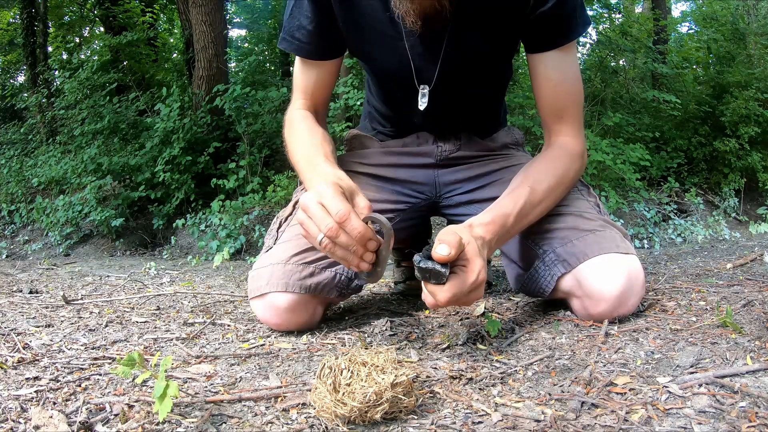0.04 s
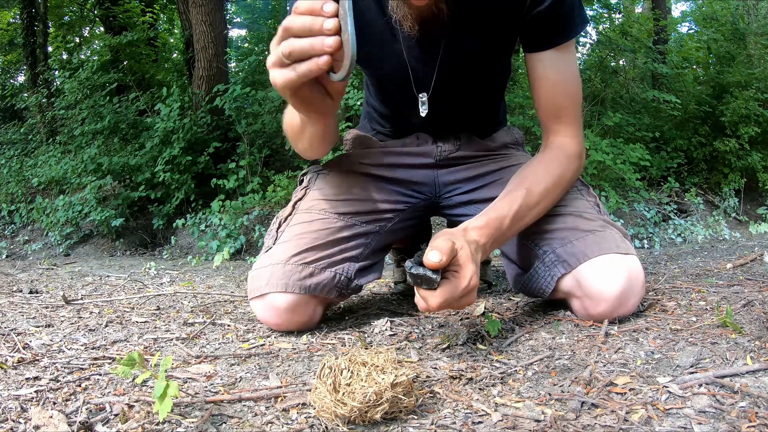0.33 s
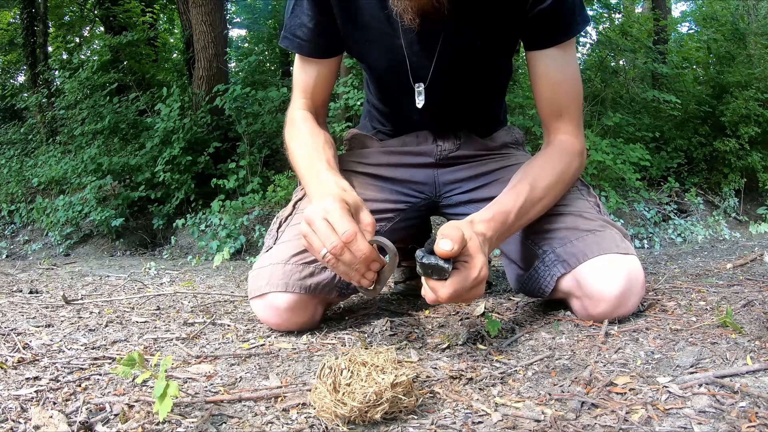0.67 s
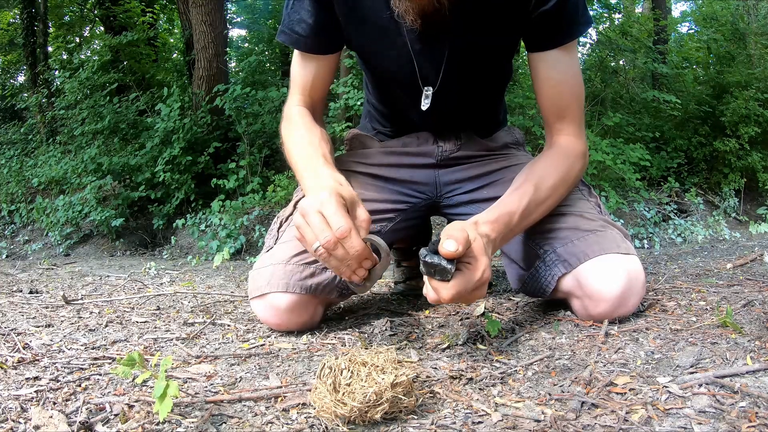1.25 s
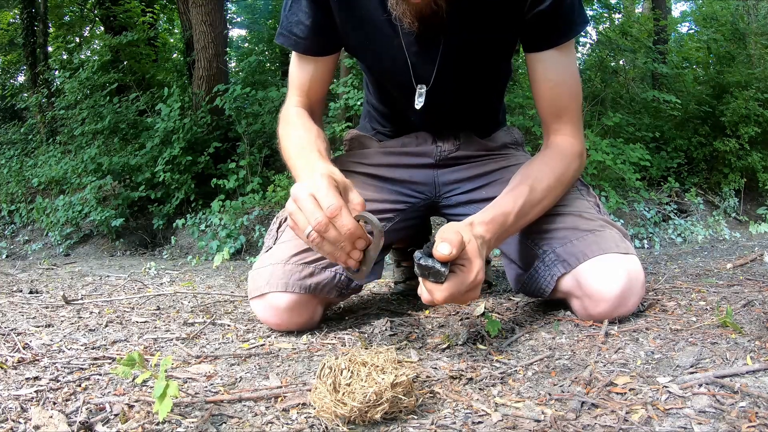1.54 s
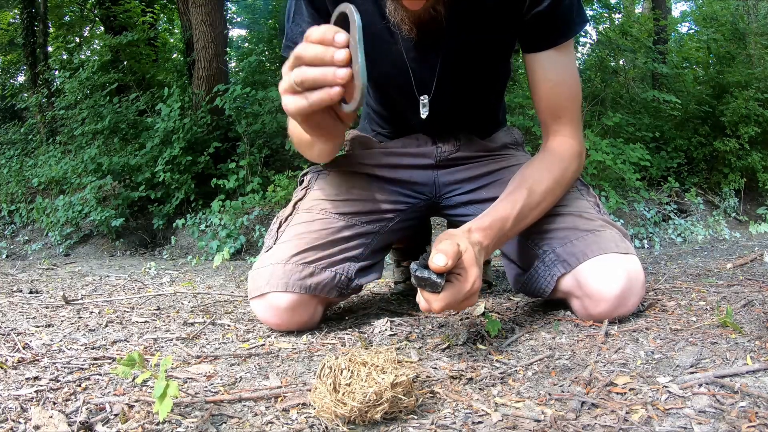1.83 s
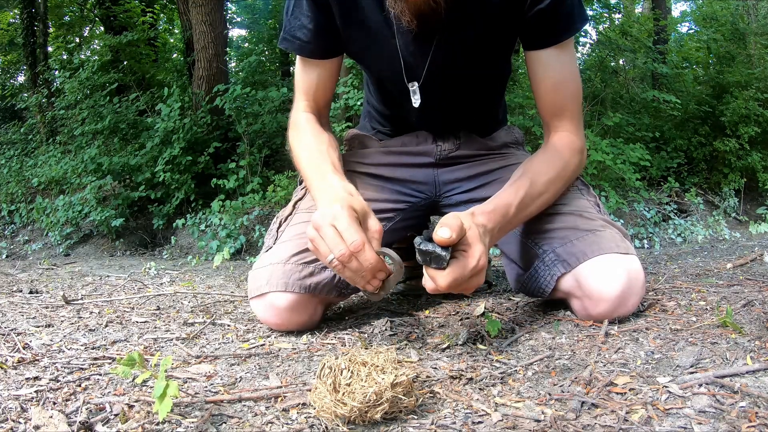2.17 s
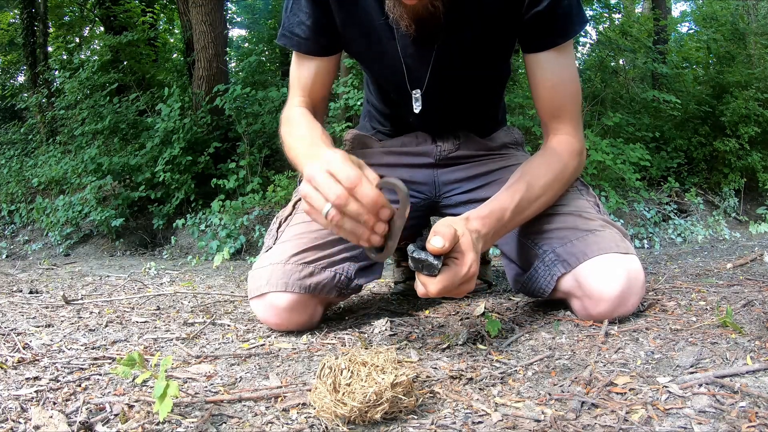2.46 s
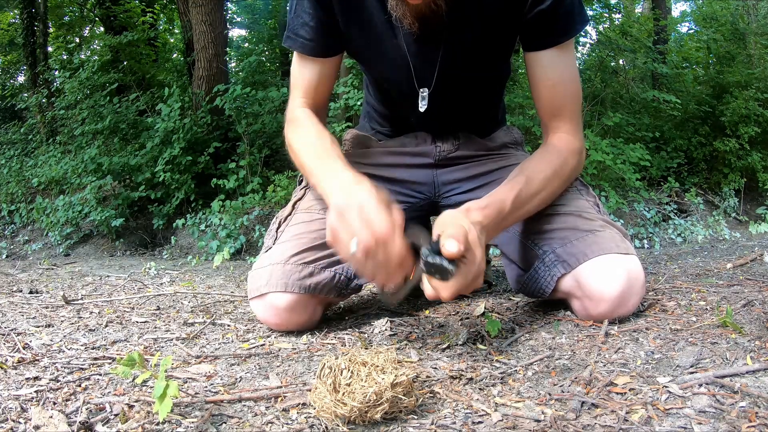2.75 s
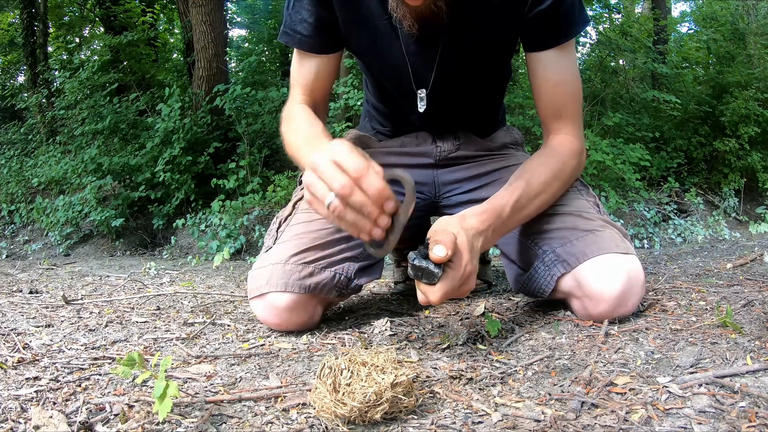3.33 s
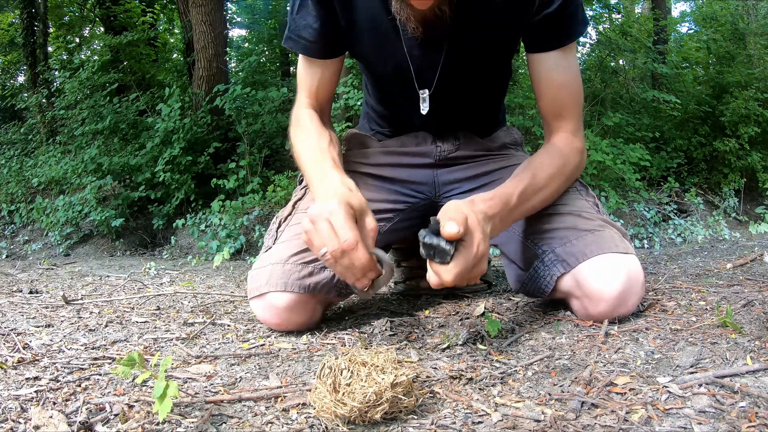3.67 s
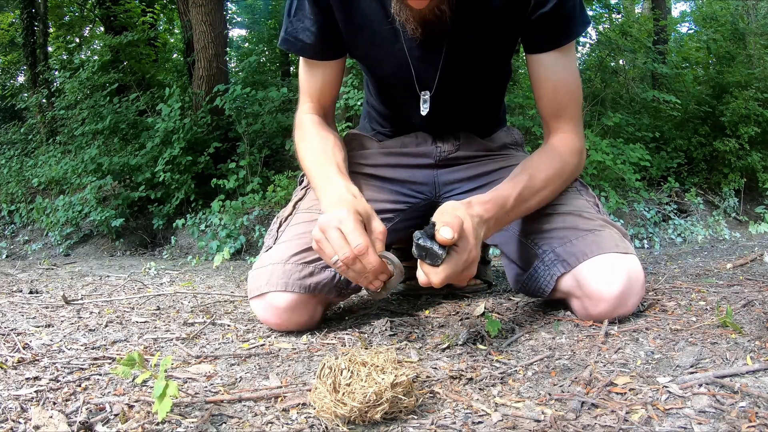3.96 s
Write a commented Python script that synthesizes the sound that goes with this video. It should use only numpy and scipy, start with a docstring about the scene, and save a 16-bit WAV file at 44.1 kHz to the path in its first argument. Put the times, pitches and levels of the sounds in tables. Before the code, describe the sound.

Sharp clicks of steel hitting stone come five times, a little under a second apart, close by in a forest. Behind them small birds chirp, one nearer and later one farther off, over soft rumble and leaf hiss.

```python
"""In a forest, a hand-held fire steel strikes a stone five times, close by.
Each blow is a crack, a few milliseconds of scraping and a rebound; this force excites the modes
of steel and stone, leaving a faint ring, and the trees scatter the sound back. Songbirds sing
gliding tones over a low outdoor rumble. An automatic gain control ducks after every blow."""
import sys
import numpy as np
from scipy import signal
from scipy.fft import rfft, irfft
from scipy.io import wavfile
from scipy.ndimage import uniform_filter1d, minimum_filter1d

SR = 44100
rng = np.random.default_rng(int(sys.argv[2]) if len(sys.argv) > 2 else 0)


def inscribe(sig):
    """Save sig as 16-bit PCM at rate SR to the path in sys.argv[1].

    A 1-D sig is mono; a 2-D sig holds one channel per row.
    Samples are clipped to [-1, 1] before scaling.
    """
    pcm = np.round(np.clip(np.atleast_2d(sig).T, -1, 1) * 32767)
    wavfile.write(sys.argv[1], SR, pcm.astype(np.int16))


N = 176400
SIDES = np.array([[.5], [-.5]])  # splits a left-minus-right difference between the channels

# likeness of diffuse sound at the two microphones (frequency [Hz], coherence [ratio])
COHERENCE = [(30, .995), (150, .997), (350, .95), (700, .7), (1400, .55), (2500, .75), (4200, .85),
             (5500, .5), (9000, .05)]


def amp(db):
    """Decibels to amplitude ratio."""
    return 10 ** (np.asarray(db) / 20)


def unit_rms(x):
    """Normalisation to an rms of 1."""
    return x / np.sqrt(np.mean(x ** 2) + 1e-20)


def read(points, hz):
    """Interpolation of a table on a log-frequency axis."""
    f, value = np.transpose(points)
    return np.interp(np.log(hz + 1), np.log(f + 1), value)


def add(mix, start, sound):
    """Superposition: a sound joins the mix at a time in seconds."""
    part = mix[..., max(round(start * SR), 0):][..., :sound.shape[-1]]
    part += sound[..., :part.shape[-1]]


def drift(t, rate):
    """Slow noise: straight lines through rate random values a second."""
    return np.interp(t * rate, np.arange(2048), rng.standard_normal(2048))


def minimum_phase(db):
    """Minimum phase: the most compact causal impulse response with the given gains."""
    log_gain = np.log(amp(np.r_[db, db[-2:0:-1]]))
    return np.fft.ifft(np.exp(np.conj(signal.hilbert(log_gain)))).real


def diffuse_pair(left, independent, hz):
    """Partial coherence: two noise spectrograms become a stereo pair, most alike in the bass."""
    same = read(COHERENCE, hz)[:, None]
    return np.array([left, same * left + np.sqrt(1 - same ** 2) * independent])


def air():
    """Spectrally shaped noise: outdoor rumble and leaf hiss with drifting patches."""
    # noise spectrum (frequency [Hz], relative density [dB])
    spectrum = [(12, -28), (20, -5.5), (48, -6), (72, 2.5), (167, -5.5), (420, -17), (525, -19.5),
                (571, -18), (639, -19), (695, -17), (1030, -18), (1800, -24.5), (2440, -26), (4770, -25.5),
                (7680, -39), (9330, -43.5), (11000, -58.5), (14200, -77), (15900, -78)]
    # stereo balance (frequency [Hz], left minus right [dB])
    balance = [(150, 0), (700, -2), (2000, 0)]
    frames, hz = N // 512 + 6, np.fft.rfftfreq(2048, 1 / SR)
    left_re, left_im, other_re, other_im, patches = rng.standard_normal((frames, len(hz), 5)).T
    patches = uniform_filter1d(patches, size=14, axis=0)  # across frequency
    patch_db = unit_rms(uniform_filter1d(patches, size=8, axis=1))  # across time
    pair = diffuse_pair(left_re + 1j * left_im, other_re + 1j * other_im, hz)
    pair *= amp(read(spectrum, hz)[:, None] + patch_db + (SIDES * read(balance, hz))[:, :, None])
    wash = signal.istft(pair, nperseg=2048, noverlap=1536)[1][:, :N]
    return amp(-35) * unit_rms(wash)


def hum():
    """Random modulation of level and pitch makes a faint, far hum waver."""
    # steady tones (frequency [Hz], level [dB])
    tones = [(62, -42.5), (523, -61.5), (638, -56), (695, -64)]
    t, out = np.arange(N) / SR, np.zeros(N)
    for hz, db in tones:
        level = amp(db + 3.1 * drift(t, 4.67))
        phase = 2 * np.pi * np.cumsum(hz + 3 * drift(t, 12)) / SR
        out += level * np.sqrt(2) * np.sin(phase)
    return out


def forest_echo(x):
    """Scattering from trunks and leaves: reverberation in which each band decays at its own rate."""
    # reverberation time (frequency [Hz], T60 [s])
    decay_times = [(500, 0.4), (3000, 0.41), (6000, 0.64), (13000, 0.55)]
    reflections = rng.standard_normal((2, SR)) * (rng.random((2, SR)) < .06)
    hz, t, bands = signal.stft(reflections, SR, nperseg=256)
    envelope = amp(-60 * t / read(decay_times, hz)[:, None]) * np.minimum(t / 0.0043, 1)
    tail = signal.istft(diffuse_pair(*bands, hz) * envelope, SR, nperseg=256)[1]
    return signal.fftconvolve(x, tail / np.linalg.norm(tail[0]), axes=1)[:, :N]


def note(length, first_hz, middle_hz, last_hz, db, flutter_hz=0, swing_hz=0):
    """Frequency modulation: a whistle bends through three pitches; flutter chops it into sweeps."""
    t = np.arange(0, length, 1 / SR)
    progress, cycle = t / length, (t * flutter_hz) % 1
    glide = np.polyval(np.polyfit([0, .5, 1], [first_hz, middle_hz, last_hz], 2), progress)
    hz = glide * (1 + 0.0191 * drift(t, 400)) + swing_hz * (2 * cycle - 1)
    fade = np.sin(np.pi / 2 * np.clip(np.minimum(progress, 1 - progress) / 0.17, 0, 1))
    level = fade * amp(db + 3.5 * drift(t, 231.5))
    pulses = np.sin(np.pi * cycle) ** 0.58 if flutter_hz else 1
    return level * pulses * np.sqrt(2) * np.sin(2 * np.pi * np.cumsum(hz) / SR)


def phrase(notes):
    """Superposition of notes. A note row is (time [s], length [s], start [Hz], middle [Hz], end [Hz],
    level [dB]); a flutter row adds (flutter rate [Hz], swing [Hz])."""
    out = np.zeros(N)
    for start, *shape in notes:
        add(out, start, note(*shape))
    return out


def repeat(starts, notes):
    """Delayed, scaled copies of one phrase."""
    out, group = np.zeros(N), phrase(notes)
    for start, db in starts:
        add(out, start, amp(db) * group)
    return out


def perch(song, pan_db, echo_db):
    """Level difference gives a bird its direction, the share of reverberation its distance."""
    direct = song * amp([[pan_db], [-pan_db]])
    return direct + amp(echo_db) * forest_echo(direct)


def deep_wood():
    """Beyond the critical distance, birds are heard mostly as reverberation."""
    # soft whistles (note rows)
    whistles = [(.14, 0.059, 2780, 2984, 3030, -47), (.21, .05, 4490, 4870, 5070, -51),
                (.54, 0.068, 2460, 2406, 2260, -52), (.655, 0.067, 3000, 2936, 2990, -45.5),
                (.81, 0.061, 3150, 3020, 3000, -53), (.92, 0.032, 2680, 2680, 2600, -49),
                (2.955, 0.075, 4600, 4445, 4430, -41.5), (3.05, .09, 4590, 4600, 4680, -46)]
    return amp(-5) * perch(phrase(whistles), pan_db=0, echo_db=5)


def far_bird():
    """Near the critical distance, echo matches direct sound: swelling chips, a flourish and rasps."""
    # run of chips (time [s], level [dB])
    chips = [(2.875, -43), (2.94, -43.5), (3.003, -47), (3.072, -39), (3.138, -33), (3.25, -31),
             (3.359, -29.5), (3.468, -29)]
    # down-up glide of one chip (note rows)
    chip = [(0, 0.0168, 4320, 3847, 3220, -4.4), (.018, 0.0163, 3600, 4000, 4800, -4.8)]
    # rasp that ends each chip (flutter rows)
    chip_tail = [(.03, .035, 4600, 4934, 5140, -8.5, 260, 765)]
    # closing flourish (note rows)
    flourish = [(3.669, 0.03, 5290, 3800, 3000, -36), (3.709, 0.029, 3000, 3620, 4200, -33.5),
                (3.74, 0.015, 4000, 3400, 2930, -33)]
    # closing rasps (flutter rows)
    rasps = [(3.585, 0.1, 7970, 7400, 6240, -51, 210, 910), (3.855, .04, 5700, 5550, 5640, -41, 265, 350),
             (3.888, 0.051, 4820, 5120, 5060, -35.5, 190, 700),
             (3.94, 0.03, 5010, 4130, 3120, -32.5, 280, 330),
             (3.965, 0.0375, 5340, 4930, 4600, -42, 150, 600),
             (3.972, 0.0293, 3280, 2695, 2300, -40, 211, 350)]
    song = repeat(chips, list(chip) + list(chip_tail)) + phrase(flourish) + phrase(rasps)
    return perch(song, pan_db=0.4, echo_db=-0.5)


def near_bird():
    """Direct sound dominates in a nearer bird's song of modulated tones, a little to the right."""
    # entries of the motif (time [s], level [dB])
    entries = [(1.649, -39), (1.796, -39), (1.946, -39), (2.092, -38)]
    # three-note motif (note rows)
    motif = [(0, 0.0215, 5490, 4900, 4700, -7), (0.048, .026, 3055, 3400, 3900, -1),
             (0.067, .017, 3600, 3150, 2800, -3.5)]
    # single whistles (note rows)
    whistles = [(.008, 0.017, 4550, 4900, 5780, -43), (0.018, 0.042, 5120, 4850, 4896, -34),
                (0.273, 0.069, 3480, 3600, 3850, -44), (0.338, .047, 4270, 4650, 5400, -51),
                (0.37, 0.038, 4300, 3750, 3280, -40), (0.379, 0.016, 4230, 4900, 5700, -44),
                (0.48, 0.053, 3890, 4350, 4780, -46), (0.612, 0.054, 4300, 4650, 5330, -45),
                (0.66, 0.0214, 4330, 4750, 5070, -43), (1.258, 0.013, 3900, 5000, 6000, -37),
                (1.274, .024, 5330, 4250, 3740, -36), (1.301, 0.019, 3180, 3860, 4420, -37),
                (1.32, 0.021, 4410, 3350, 2800, -39), (1.412, 0.016, 4200, 4300, 4280, -40.5),
                (1.422, 0.035, 3590, 3150, 2660, -41.5), (1.468, 0.093, 3050, 4000, 2670, -42.5),
                (2.545, .018, 4660, 3800, 3200, -41.5)]
    # arching trill (flutter rows)
    trill = [(2.645, .185, 3470, 4880, 3150, -39, 60, -450)]
    # falling slurs (time [s], level [dB])
    slurs = [(.736, -42), (0.798, -39.5), (.869, -41.5), (.932, -38), (1.005, -37), (1.067, -36.5),
             (1.135, -37)]
    # glide of a slur (length [s], start [Hz], middle [Hz], end [Hz])
    slur = (0.028, 5500, 3650, 3840)
    # rising buzzes (time [s], level [dB])
    buzzes = [(2.238, -40.5), (2.314, -38), (2.389, -37.5), (2.466, -38)]
    song = repeat(entries, motif) + phrase(whistles) + phrase(trill)
    for start, db in slurs:
        add(song, start, note(*slur, db))
    for start, db in buzzes:
        add(song, start, note(.045, 4200, 5750, 5850, db, flutter_hz=170, swing_hz=620))
    return perch(song, pan_db=-1.1, echo_db=-9)


def contact_force(t, impact_db, scrape_db, scrape_s, rebound_s, rebound_db):
    """Impact and friction: the steel hits, drags over the stone's edge and hits again."""
    scrape_fade_s, crush_s, stereo_width = 0.0039, 0.00083, 0.62
    noise = rng.standard_normal((3, 3, len(t)))
    grit = noise[:, :1] + stereo_width * np.diff(noise[:, 1:], prepend=0)  # sides differ in the treble
    scrape, impact, rebound = grit / np.sqrt(SR / 1000)
    force = scrape / 2 * amp(scrape_db) * np.exp(-np.maximum(t - scrape_s, 0) / scrape_fade_s)
    for delay, db, crumbs in (0, impact_db, impact), (rebound_s, rebound_db, rebound):
        crush = amp(2) * crumbs * np.exp(-t / crush_s)
        add(force, delay, amp(db) * ((t == 0) + crush))
    return force


def body_response(t, clink_db):
    """Modal impulse response of steel and stone: damped sinusoids under a broadband crack."""
    # short modes, damped by the hands (frequency [Hz], level [dB], T60 [s])
    damped = [(2240, -59, .02), (2870, -2.5, 0.016), (2973, -27.5, 0.0076), (3770, -9, 0.028),
              (4000, -28, 0.014), (4300, -5.5, 0.02), (4600, -8, 0.011), (4830, -3, 0.017),
              (5700, -23, .012), (8500, -10, 0.01), (9020, -6, 0.019), (9700, -8, .012)]
    # long, faint ring of the steel (frequency [Hz], level [dB], T60 [s])
    ring = [(2400, -67, 0.65), (6540, -55, 0.84), (8825, -45, 0.44)]
    # spectrum of the bare crack (frequency [Hz], level [dB])
    crack = [(200, -18), (900, -10), (1700, -16.5), (2500, 4), (4300, 13.5), (6000, 7), (7800, -5.5),
             (9500, 1.5), (11500, -46), (15500, -46)]
    clink = (6650, clink_db - 10, 0.0058)
    response = np.zeros((2, len(t)))
    for hz, db, t60 in [*damped, *ring, clink]:
        phase = 2 * np.pi * hz * rng.normal(1, 0.0027) * t
        lag = SIDES * (hz / 8800) ** 2 * rng.normal(0.41, 0.97)  # high modes differ between the sides
        response += amp(db - 16 - 60 * t / t60) * np.sin(phase - lag)
    add(response, 0, amp(-6) * minimum_phase(read(crack, np.fft.rfftfreq(2048, 1 / SR))))
    return response


def blow_colour(tilt_db, knock_db):
    """Spectral shaping of a blow: a common curve, a tilt and a peak or dip at the pitch of the knock."""
    # colour at the microphones (frequency [Hz], gain [dB])
    colour = [(40, -29), (400, -8), (900, -6), (1600, -11.5), (2400, 4.5), (5000, -2), (7800, 1),
              (9500, -7), (11500, -12), (15500, -27)]
    knock_hz, knock_width_hz = 2550, 640
    hz = np.fft.rfftfreq(2048, 1 / SR)
    tilt = tilt_db * np.log2(np.clip(hz, 1500, 12000) / 4300)
    knock = knock_db * np.exp(-((hz - knock_hz) / knock_width_hz) ** 2)
    return minimum_phase(read(colour, hz) + tilt + knock)


def fire_steel():
    """Forced vibration: each blow is its contact force convolved with the response of steel and stone."""
    # blows (time [s], impact [dB], scrape [dB], scrape length [s], rebound delay [s], rebound [dB],
    # tilt [dB/octave], clink [dB], knock [dB], left minus right [dB])
    blows = [(0.4932, 0.5, -13.5, 0.018, 0.0069, -10.5, 0, -17, -4, 1.5),
             (1.1366, -9, -2, 0.0061, 0.0034, -15, 0, 2, 0, -0.5),
             (1.9877, 7, -0.5, 0.0077, 0.0049, -9, 2.5, 5.5, -3, -2),
             (2.8395, -4.5, -1.5, 0.0013, 0.013, -18, 3.5, 4.5, 6.5, -1),
             (3.6450, -6, -5.5, 0.0027, .0009, 0.5, 1, 16, 6.5, 0)]
    t, direct = np.arange(16384) / SR, np.zeros((2, N))
    for start, *contact, tilt_db, clink_db, knock_db, pan_db in blows:
        vibration = signal.fftconvolve(contact_force(t, *contact), body_response(t, clink_db), axes=1)
        blow = signal.fftconvolve(vibration, blow_colour(tilt_db, knock_db)[None], axes=1)
        add(direct, start, amp(7 + pan_db * SIDES) * blow)
    return direct + amp(-24.5) * forest_echo(direct)


def housing(x):
    """Phase difference: the body that holds the microphones shifts one against the other."""
    # lead of the left microphone (frequency [Hz], phase [rad])
    phase_lead = [(1000, 0), (2500, 0), (3500, 0.17), (4500, 0.49), (5500, 0.94), (7000, 1.45), (9000, 0)]
    shift = SIDES * read(phase_lead, np.fft.rfftfreq(2 * N, 1 / SR))
    return irfft(rfft(x, 2 * N) * np.exp(1j * shift))[:, :N]


def scene():
    """Superposition of steel, birds and forest air at two microphones."""
    return housing(fire_steel() + near_bird() + far_bird() + deep_wood() + air() + hum())


def record(dry):
    """Compression: the gain ducks at each blow and recovers; a peak limiter and a low-pass follow."""
    threshold_db, duck_share, sense_s, fall_db_per_s, cutoff_hz = -22, 0.49, 0.0026, 116.5, 15900
    pole = np.exp(-1 / (sense_s * SR))
    power = signal.lfilter([1 - pole], [1, -pole], (dry ** 2).mean(0))
    fall = np.arange(N) * fall_db_per_s / SR
    held_db = np.maximum.accumulate(10 * np.log10(power + 1e-12) + fall) - fall  # peaks sink steadily
    ducked = dry / amp(duck_share * np.maximum(held_db - threshold_db, 0))
    limit_gain = 1 / np.maximum(abs(ducked).max(0), 1)
    limited = ducked * uniform_filter1d(minimum_filter1d(limit_gain, size=33), size=33)
    lowpass = signal.firwin(255, cutoff_hz, window=("kaiser", 9), fs=SR)
    return signal.oaconvolve(limited, lowpass[None], "same")


dry = scene()
out = record(dry)
inscribe(out)
```